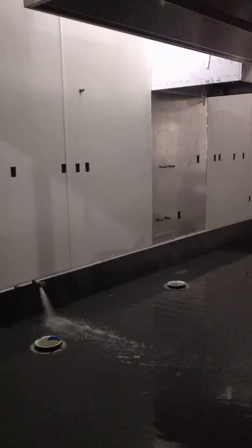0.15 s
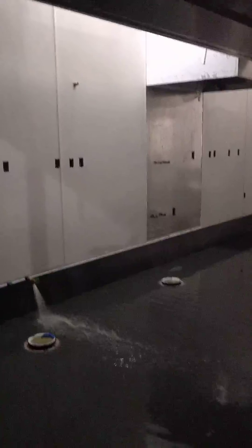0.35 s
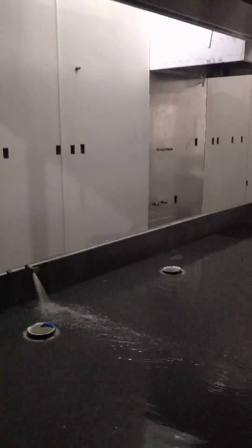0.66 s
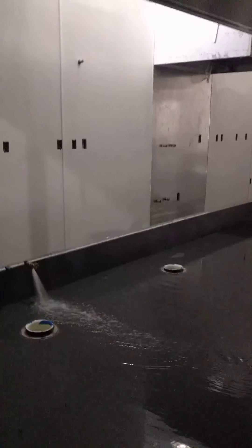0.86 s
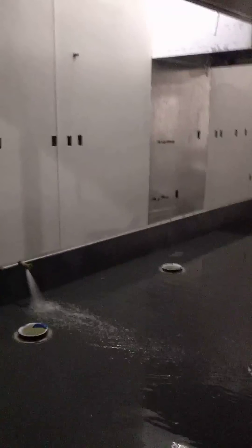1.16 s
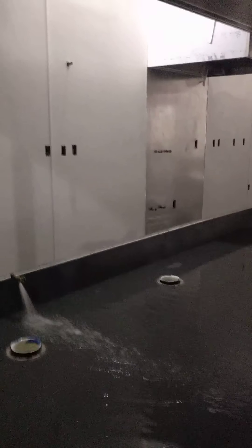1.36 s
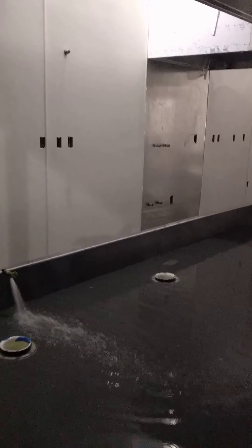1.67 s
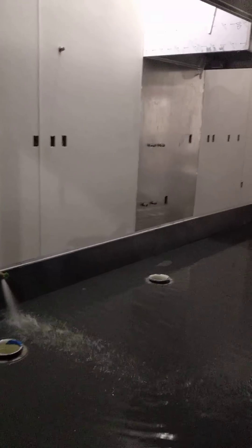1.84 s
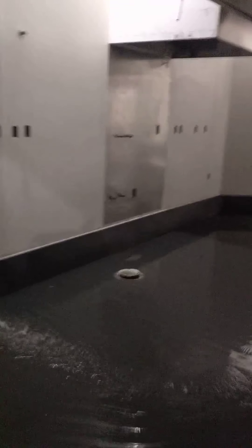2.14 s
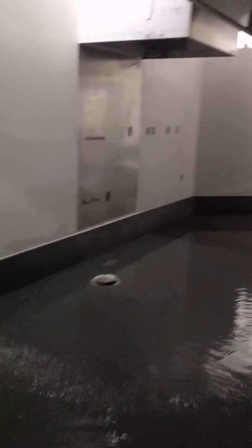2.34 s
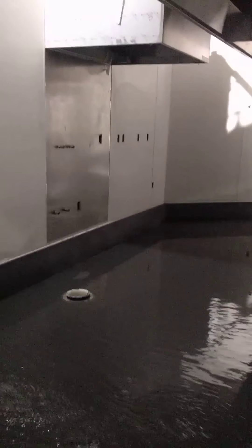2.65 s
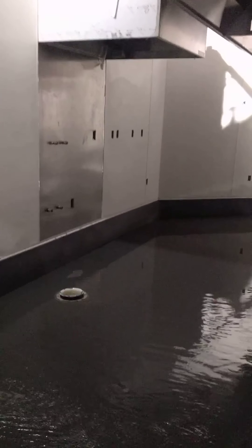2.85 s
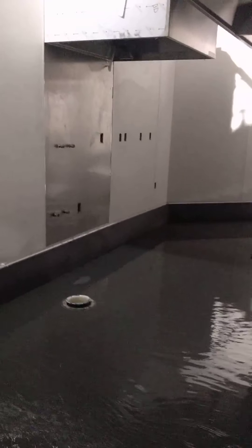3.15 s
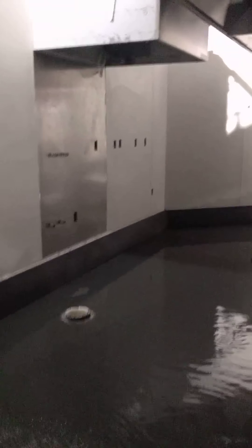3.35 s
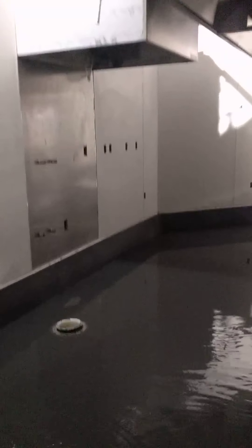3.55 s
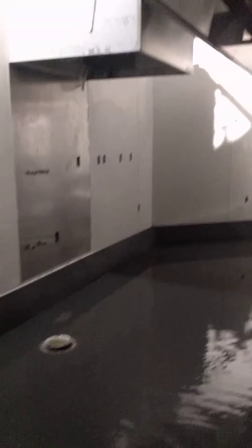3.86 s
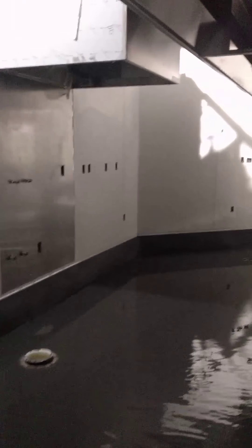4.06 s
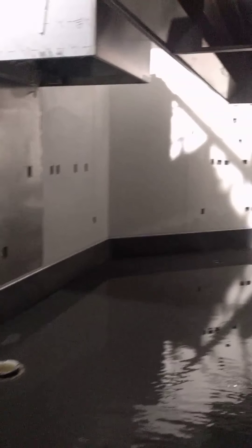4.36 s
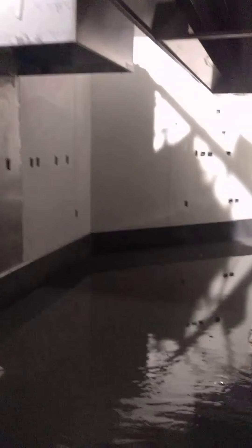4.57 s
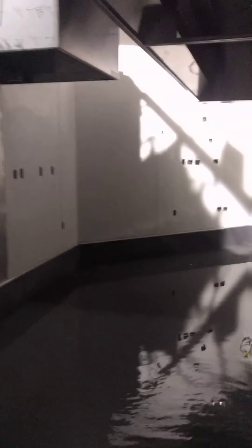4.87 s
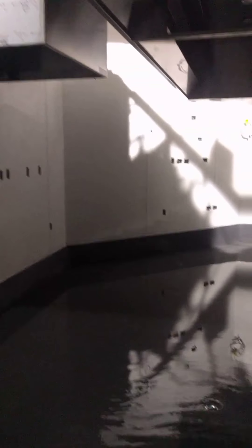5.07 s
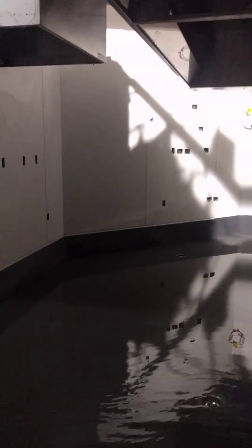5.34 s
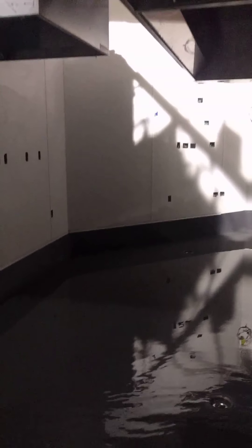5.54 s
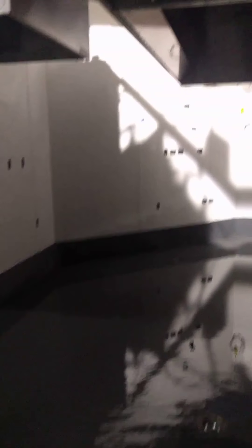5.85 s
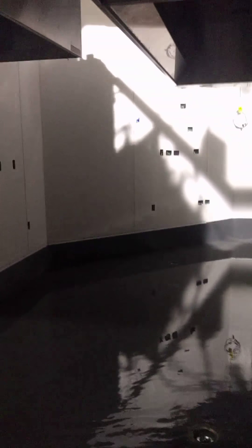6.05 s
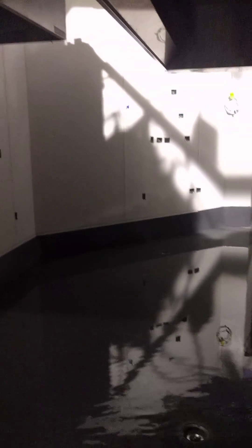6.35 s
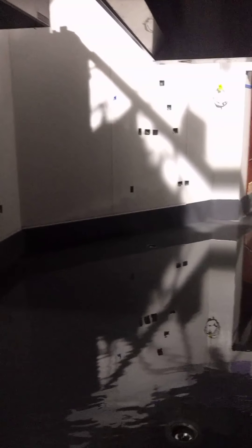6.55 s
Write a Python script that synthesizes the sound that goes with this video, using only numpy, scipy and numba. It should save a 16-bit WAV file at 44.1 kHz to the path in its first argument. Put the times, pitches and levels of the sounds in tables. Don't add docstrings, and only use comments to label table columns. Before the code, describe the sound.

Steady rushing water sprays from a wall pipe onto standing water in a hard-walled room, sizzling sharply while odd bubbles plink.

```python
import sys
import numpy as np
from scipy import signal
from scipy.fft import rfft, irfft
from scipy.io import wavfile
from scipy.ndimage import uniform_filter1d
from numba import njit

SR = 44100
rng = np.random.default_rng(int(sys.argv[2]) if len(sys.argv) > 2 else 0)


def generate_wav(signal):
    frames = np.transpose(np.atleast_2d(signal))
    scaled = np.clip(frames, -1, 1) * 32767
    pcm = np.round(scaled).astype(np.int16)
    wavfile.write(sys.argv[1], SR, pcm)


def to_linear_factor(level_db):
    exponent = np.asarray(level_db, float) / 20
    return 10 ** exponent


N = 295911


def level(x, db):
    return x * to_linear_factor(db) / np.sqrt(np.mean(x ** 2))


def colour(x, spectrum):
    hz = np.arange(N // 2 + 1) * SR / N
    bins = rfft(x)
    broad = np.sqrt(uniform_filter1d(np.abs(bins) ** 2, size=1200) + 1e-18)
    point_hz, point_db = np.transpose(spectrum)
    db = np.interp(np.log(hz + 1), np.log(point_hz), point_db, left=-120, right=-120)
    return level(irfft(bins / broad * to_linear_factor(db), N), 0)


def resonance(hz, width_hz, db):
    b, a = signal.iirpeak(hz, hz / width_hz, fs=SR)
    return level(signal.lfilter(b, a, rng.standard_normal(N)), db)


def walk(rate_hz):
    hold = int(SR / rate_hz)
    values = rng.standard_normal(N // 100)[:N // hold + 1]
    steps = np.repeat(values, hold)
    slewed = uniform_filter1d(uniform_filter1d(steps, hold), hold)
    return 1.3 * slewed[:N]


@njit
def ring(start, hz, cycles, size, glide):
    out = np.zeros(N)
    for g in range(len(start)):
        life = cycles[g] * SR / hz[g]
        step = 2 * np.pi * hz[g] / SR
        swing = np.exp(complex(-1 / life, step))
        climb = np.exp(complex(0., step * glide / life))
        z = complex(size[g], 0.)
        for i in range(start[g], min(N, start[g] + int(5 * life))):
            out[i] += z.imag
            z *= swing
            swing *= climb
    return out


def room(x, wet_db):
    hop = 256
    grid = dict(fs=SR, nperseg=4 * hop, noverlap=3 * hop)
    hz, _, cells = signal.stft(x, **grid)
    power = np.abs(cells.T) ** 2
    low_t60_s, treble_t60_s, knee_hz = 1.23, 0.98, 2980
    t60_s = treble_t60_s + (low_t60_s - treble_t60_s) / (1 + (hz / knee_hz) ** 2)
    keep = 1e-6 ** (hop / SR / t60_s)
    stored = np.empty_like(power)
    held = 1.4 * np.median(power, axis=0)
    for k, fresh in enumerate(power):
        stored[k] = held
        held = keep * held + (1 - keep) * fresh
    noise = signal.stft(rng.standard_normal(N), **grid)[2]
    noise = noise / np.sqrt(np.mean(np.abs(noise) ** 2))
    tail = signal.istft(noise * np.sqrt(stored.T), **grid)[1][:N]
    return x + to_linear_factor(wet_db) * tail


def swarm(count, lo_hz, hi_hz, cycles, scatter_db, surge_db):
    when, pitch, luck, life = rng.random((count, 4)).T
    start = (when * N).astype(np.int64)
    surge = surge_db * (walk(9) + walk(25.03))
    size = to_linear_factor(-scatter_db * np.log(1 - luck) + surge[start])
    hz = lo_hz * (hi_hz / lo_hz) ** pitch
    return room(ring(start, hz, cycles * (.5 + life), size, 0.04), wet_db=8.5)


# start_s, share (0-1)
PHONE_TURN = [
    (0, 0),
    (1.5, 0.17),
    (2.7, 0.22),
    (3.3, 0.6),
    (4.4, 0.86),
    (5.6, 0.96),
    (6.71, 0.85),
]


def phone_turn():
    s, share = np.transpose(PHONE_TURN)
    return np.interp(np.arange(N) / SR, s, share)


def heard(turn, before_db, change_db):
    return to_linear_factor(before_db + change_db * turn)


# pitch_hz, level_db (per Hz)
RUMBLE_SPECTRUM = [(22, -24), (31, -21), (42, -5), (50, 1), (60, -3), (75, 0.5), (86, -7), (110, -9),
                   (150, -35)]
# centre_s, lift_db, half_length_s
RUMBLE_SWELLS = [(.15, 3, .2), (.75, 7.5, .35), (1.9, 6.5, .3), (3.5, 2.5, .2), (4.4, 5.5, .4),
                 (6.52, 4, .15)]


def building_rumble():
    t = np.arange(N) / SR
    lift_db = sum(db * np.exp(-((t - s) / half_s) ** 2) for s, db, half_s in RUMBLE_SWELLS)
    return to_linear_factor(-62.5 + lift_db) * colour(rng.standard_normal(N), RUMBLE_SPECTRUM)


# pitch_hz, level_db (per Hz)
DRONE_SPECTRUM = [(60, -28), (88, -5), (120, -6.5), (140, -5), (200, -1.5), (400, -3), (600, -26),
                  (900, -40)]


def building_drone(turn):
    return heard(turn, -53.8, -1.5) * colour(rng.standard_normal(N), DRONE_SPECTRUM)


# pitch_hz, width_hz, level_db
MACHINE_HUM = [(58.9, 3, -3), (120.6, 8.9, -0.5), (180.5, 15, -3), (220, 12, -5)]


def distant_machines(turn):
    return heard(turn, -60, -7) * sum(resonance(*line) for line in MACHINE_HUM)


# pitch_hz, width_hz, level_db
PIPE_MODES = [(2104, 31, 3.5), (4230, 110, 4)]


def pipe_whistle(turn):
    return heard(turn, -58, 5) * sum(resonance(*mode) for mode in PIPE_MODES)


# start_s, level_db (peak), pitch_hz
BIG_BUBBLES = [(0.499, -53, 857), (0.958, -42, 2648), (0.958, -35, 3620), (1.051, -36, 3875),
               (1.12, -54, 737), (1.318, -41, 1490), (1.323, -48, 2993), (2.264, -41, 2863),
               (2.508, -50, 886), (3.32, -42, 2850), (3.808, -37, 4285), (3.883, -40, 3880),
               (4.127, -39, 3682), (4.22, -43, 2648), (4.249, -55, 698), (4.592, -39.2, 4112),
               (4.609, -42, 2519), (5.207, -36, 2150), (5.23, -36.5, 1570), (5.555, -37, 2080),
               (5.59, -40, 1500), (5.683, -35, 2235), (5.712, -42, 4155), (5.863, -43, 1670),
               (6.147, -43.5, 3150), (6.217, -35, 1904), (6.275, -35, 2130), (6.449, -42.2, 3500)]


def big_bubbles():
    s, db, hz = np.transpose(BIG_BUBBLES)
    start = (s * SR).astype(np.int64)
    dry = ring(start, hz, np.full(len(s), 39.), to_linear_factor(db + 2), 0.0017)
    return room(dry, wet_db=5.5)


# pitch_hz, level_db (per Hz)
FROTH_SPECTRUM = [(250, -28), (400, -16), (640, -15.5), (800, -13), (930, -8), (1300, -6.5), (1550, -3),
                  (2050, -2), (2300, -4.5), (2650, -10), (3200, -12), (4200, -55)]


def froth(turn):
    bubbles = swarm(count=80000, lo_hz=250.5, hi_hz=3995, cycles=4.9, scatter_db=1.26, surge_db=0.21)
    return heard(turn, -36.5, 0.03) * colour(bubbles, FROTH_SPECTRUM)


# pitch_hz, level_db (per Hz)
SPRAY_SPECTRUM = [(2000, -46), (2700, -22.5), (3300, -16.5), (4200, -13), (4700, -12), (5600, -10.5),
                  (6300, -6.5), (6800, -2), (7150, .5), (7550, -2.5), (8300, -8), (9200, -15),
                  (10300, -27.5), (12500, -49)]
# pitch_hz, level_db (per Hz)
MIST_SPECTRUM = [(7500, -24), (9500, -2), (10500, -0.5), (11800, -1.5), (14000, -1), (15000, -3.5),
                 (16950, -3), (17080, -42)]


def spray(turn):
    drops = swarm(count=150000, lo_hz=1990, hi_hz=17400, cycles=3.85, scatter_db=1.25, surge_db=0.2)
    jet = heard(turn, -24.4, 2) * colour(drops, SPRAY_SPECTRUM)
    jet = jet + heard(turn, -39.5, 4.5) * colour(drops, MIST_SPECTRUM)
    b, a = signal.butter(4, 14500, "high", fs=SR)
    air = signal.filtfilt(b, a, jet)
    return jet - 0.25 * (1 - turn) * air


def scene():
    turn = phone_turn()
    building = building_rumble() + building_drone(turn) + distant_machines(turn)
    water = pipe_whistle(turn) + big_bubbles() + froth(turn) + spray(turn)
    return (building + water)[None]


def top_cut(x):
    return signal.sosfilt(signal.butter(12, 17210, fs=SR, output="sos"), x)


def record(dry):
    low_pass = signal.ellip(10, .2, 80, 17100, fs=SR, output="sos")
    mix = signal.sosfilt(low_pass, dry) - .0009
    return top_cut(mix)


dry = scene()
out = record(dry)
generate_wav(out)
```